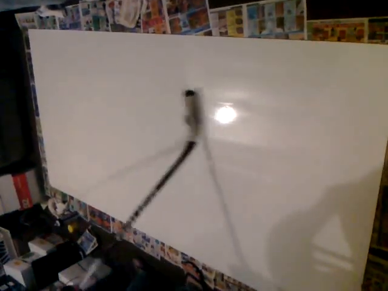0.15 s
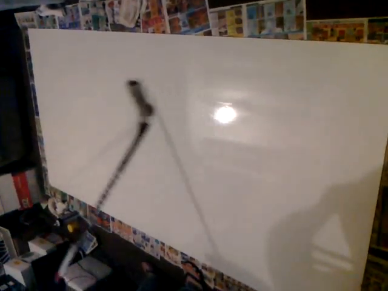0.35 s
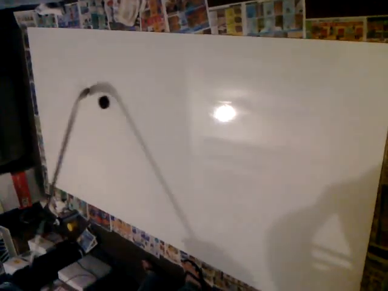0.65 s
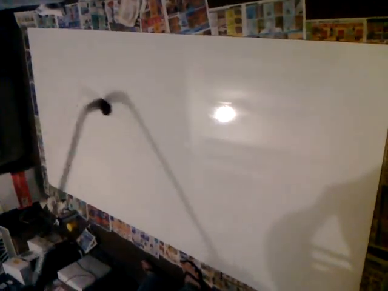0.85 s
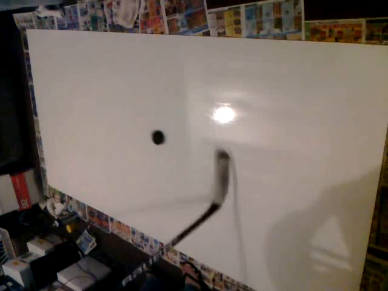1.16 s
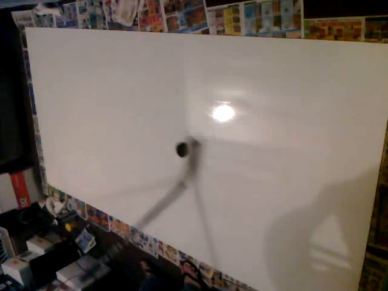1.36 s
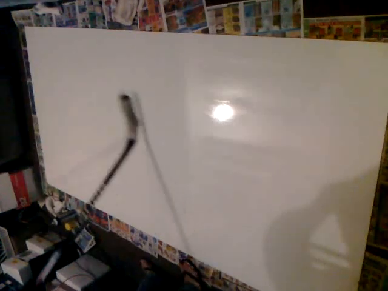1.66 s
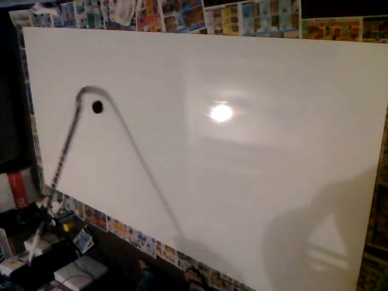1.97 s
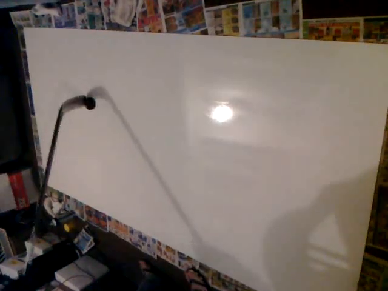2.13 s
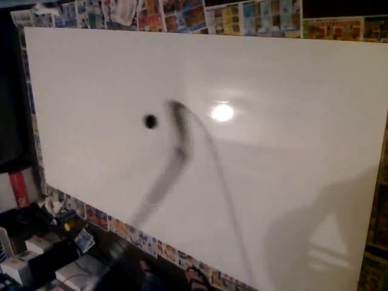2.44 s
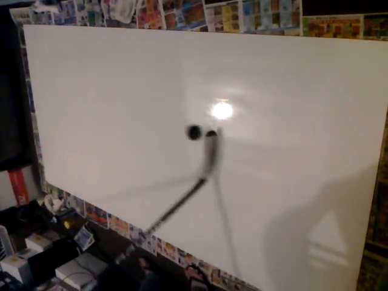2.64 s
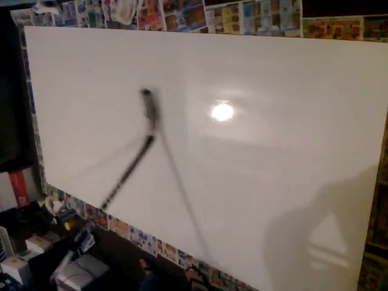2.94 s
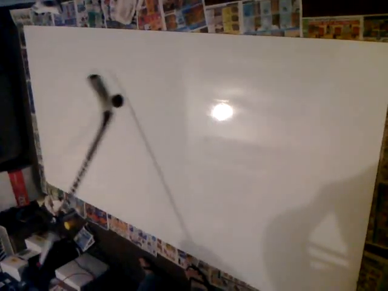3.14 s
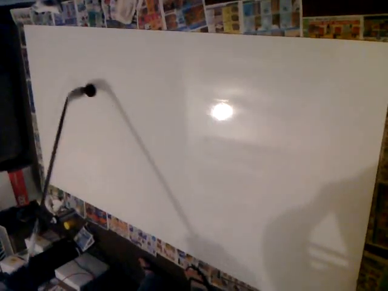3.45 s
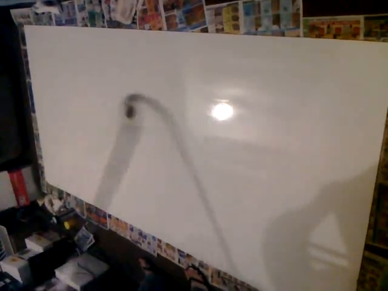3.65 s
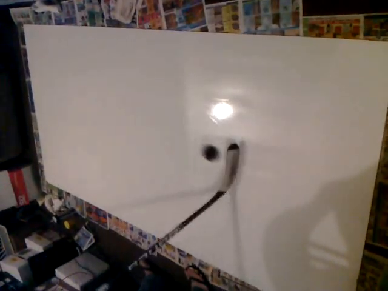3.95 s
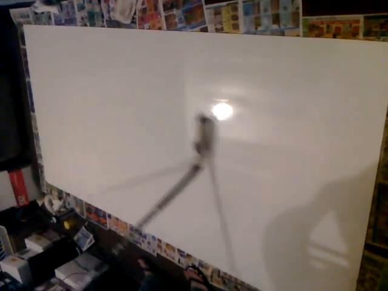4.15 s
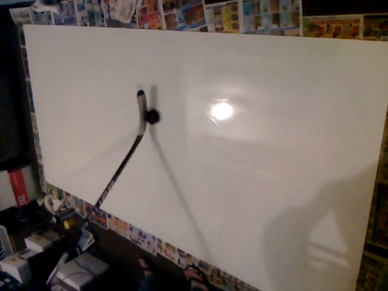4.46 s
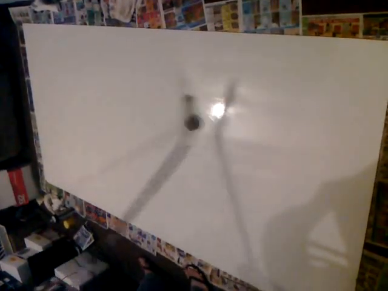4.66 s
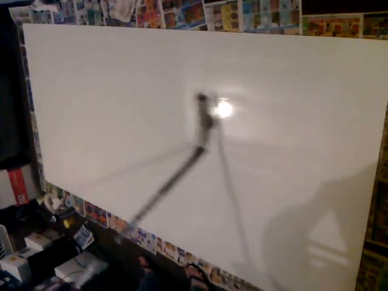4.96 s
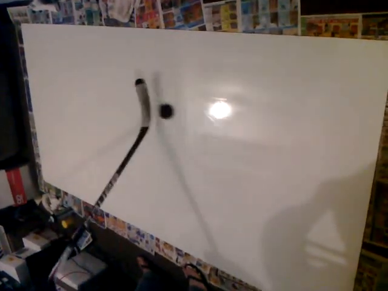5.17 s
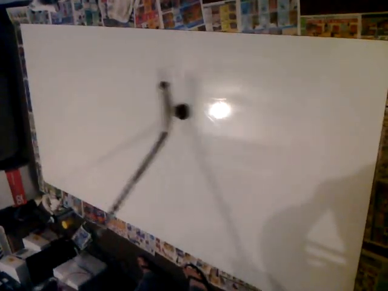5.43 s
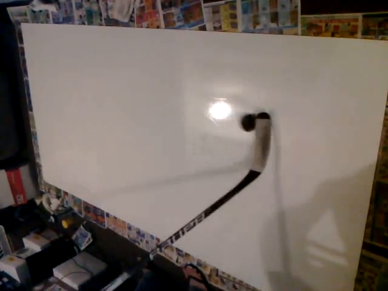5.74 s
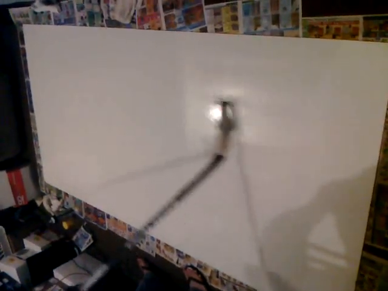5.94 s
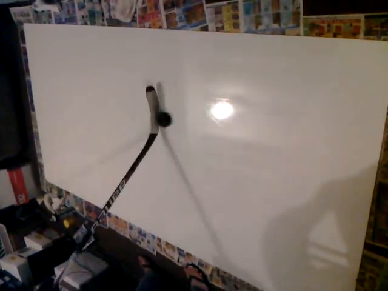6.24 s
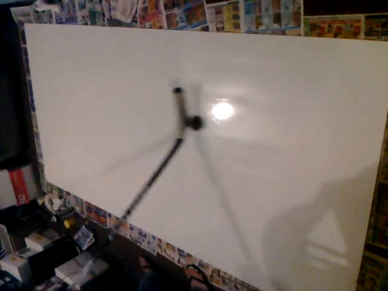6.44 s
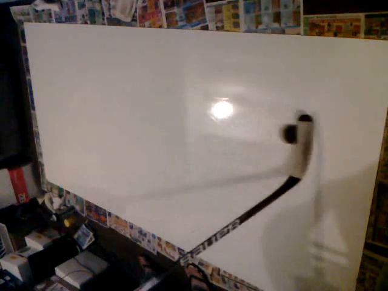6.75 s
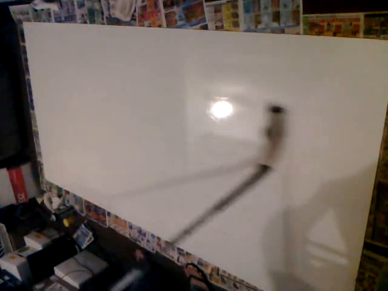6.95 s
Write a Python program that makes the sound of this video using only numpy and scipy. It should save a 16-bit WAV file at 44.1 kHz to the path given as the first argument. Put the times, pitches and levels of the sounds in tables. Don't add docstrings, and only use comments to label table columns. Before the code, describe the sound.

A small hard-walled room with faint hiss, low mains hum and a very thin high whine. At 0 s a blade drag is ending as it clacks down, with a puck knock at 0.1. A clack at 0.6 and a dull scoop at 0.8 lead into a long hissing pull until 1.2. A hard, roomy slap hits at 1.4, a set-down at 1.9, a flurry of snaps at 2.2 to 2.5 and a higher slap at 2.7. Clacks at 3.4 to 3.6 precede another scraping pull and a low, soft footfall at 3.6. Loud double knocks come at 4.1, then a busy cluster with small bright chinks from 4.4 to 4.9. Strong clacks follow near 5.3, 5.7, 5.8 and 6.3, the last especially sharp, then 6.8 to 6.9, and a faint tick at 7.1. Quiet glides and rim wobbles fill the gaps; level ducks briefly after loud blows.

```python
import sys
import numpy as np
from scipy import signal
from scipy.fft import rfft, irfft, next_fast_len
from scipy.io import wavfile

SR = 44100
rng = np.random.default_rng(int(sys.argv[2]) if len(sys.argv) > 2 else 0)


def materialize(psi):
    bounded = np.clip(np.atleast_2d(psi).T, -1, 1)
    quanta = np.round(bounded * 32767).astype(np.int16)
    wavfile.write(sys.argv[1], SR, quanta)


N = 313110

# f/Hz, level/dB per Hz
HISS_COLOUR = [(15, -44), (25, -11), (49, -6.5), (87, -9), (102, -14.5), (124, -10.5), (150, -6.5),
               (225, -14), (312, -7), (2520, -50), (7260, -38.5), (13500, -52.5), (14700, -43.5),
               (16400, -27)]
# f/Hz, level/dB rms
HUM_LINES = [(59.5, -79), (119, -71)]
HISS_DB = -76
WHINE_HZ, WHINE_DB = 15153, -87

# f/Hz, level/dB per Hz
SCRAPE_COLOUR = [(150, -27), (300, -9.5), (475, 0), (800, -9), (1500, -8), (3000, -10), (5200, -12),
                 (8000, -6.5), (10000, -11.5), (12500, -27), (15500, -34)]
# start t/s, fastest t/s, end t/s, scrape level/dB, fine hiss re scrape/dB
DRAGS = [
    (-.1, 0, .02, -46, 5),
    (.84, 1.04, 1.21, -51, 4),
    (2.25, 2.38, 2.42, -50, 2),
    (2.46, 2.51, 2.6, -57, 3),
    (3.55, 3.69, 3.86, -50, 2),
    (6.86, 6.92, 6.97, -62, 0),
]
# start t/s, fastest t/s, end t/s, scrape level/dB, fine hiss re scrape/dB
GLIDES = [(.15, .27, .33, -68, 4), (.33, .4, .62, -76, 3), (1.25, 1.36, 1.43, -66, 3),
          (1.55, 1.64, 1.78, -70, 8), (2.05, 2.14, 2.2, -68, -2), (2.85, 3.0, 3.16, -73, 6),
          (3.88, 3.92, 4.0, -73, 5), (4.5, 4.62, 4.66, -72, 2), (4.86, 4.91, 4.98, -66, 12),
          (5.06, 5.16, 5.3, -77, 12), (5.36, 5.44, 5.48, -67, -2), (5.85, 5.92, 6.04, -78, 12),
          (6.35, 6.45, 6.56, -78, 9)]
# start t/s, fastest t/s, end t/s, scrape level/dB, fine hiss re scrape/dB
WOBBLES = [(.2, .28, .33, -78, 0), (.77, .8, .81, -72, 0), (.97, 1.02, 1.21, -70, 0),
           (1.33, 1.4, 1.43, -74, 0), (2.08, 2.14, 2.18, -76, 0), (3.58, 3.61, 3.68, -63, 0),
           (3.8, 3.86, 3.92, -70, 2), (4.56, 4.64, 4.65, -72, 0), (5.47, 5.48, 5.49, -68, 0),
           (5.53, 5.58, 5.63, -64, -4), (5.96, 6.0, 6.05, -76, 0), (6.42, 6.47, 6.5, -76, 0),
           (7.02, 7.08, 7.12, -82, 0)]
DRAG_DRONE_DB, GLIDE_DRONE_DB, WOBBLE_DRONE_DB = 1, 3, 20
# scrape/dB, hiss/dB, drone/dB
STROKE_END_DB = (-4, -12, -8)
# scrape/dB, hiss/dB, drone/dB
CREEP_DB = (-77, -73, -72)
STROKE_POWER, STROKE_STOP_S = 1.5, .3
SHIVER_DB, SHIVER_RISE_S, SHIVER_T60_S = -30, .03, .6

# t/s, knock level/dB, knock f/Hz, crack level/dB, sizzle re crack/dB
SET_DOWNS = [(0.0034, -27, 410, -38, -9), (0.6322, -21, 457, -26, -11.5), (1.9049, -24, 439, -26, -9.5),
             (2.4635, -27, 467, -32, -18), (3.3648, -20, 430, -23.5, -12), (4.4238, -15, 450, -19, -14.5),
             (4.665, -29, 465, -46, -10), (4.766, -40, 430, -36, -11.5), (4.649, -38, 466, -60, -10),
             (5.255, -18, 430, -26, -12.5), (5.4866, -36, 400, -41, -11), (5.496, -30, 420, -38, -17.5),
             (5.545, -36, 430, -60, -12), (5.7149, -15, 435, -20.5, -10.5), (6.2575, -23, 450, -36, -17.5),
             (6.767, -19, 427, -26.5, -11.5), (6.896, -25, 451, -38, -12.5)]
PUCK_HITS = [(0.8529, -32, 513, -50, -30), (2.176, -40, 592, -48, -22), (2.1818, -31, 580, -25, -18),
             (2.2386, -24, 485, -29, -15.5), (2.2694, -32, 430, -38, -7), (3.5148, -23, 370, -30, -23),
             (3.5688, -29, 380, -32, -14.5), (4.088, -14.5, 430, -25, -18), (4.8678, -15, 430, -22, -19),
             (5.8279, -18, 470, -25, -20), (5.906, -25.5, 424, -27, -15), (6.2931, -14, 643, -14, -24.5),
             (6.8425, -23, 400, -25.5, -18.5), (0.1117, -20, 410, -33, -16)]
TICKS = [
    (0.278, -50, 460, -70, -8),
    (1.2883, -70, 299, -54, -8),
    (1.205, -48, 470, -65, -8),
    (3.62, -40, 450, -60, -8),
    (4.25, -50, 450, -70, -8),
    (5.022, -43, 435, -70, -8),
    (5.0644, -58, 462, -62, 1),
    (6.508, -38, 437, -60, -5),
    (7.0813, -70, 450, -56, -11),
]
SCOOPS = [
    (0.8116, -25, 380, -25, -17.5),
    (4.8038, -10.5, 440, -25, -7.5),
]
TOE_TAPS = [
    (1.343, -55, 436, -44, -6),
    (1.768, -62, 535, -58, -4.5),
    (1.836, -75, 500, -63, -5),
    (4.0565, -14, 447, -19, -15.5),
    (5.2956, -16, 540, -23.5, -15),
]
SLAPS = [
    (1.435, -12.5, 498, -19, -14),
    (2.7325, -14, 560, -24, -16),
]
CHINKS = [
    (4.6564, -31, 420, -37, -3),
    (4.676, -45, 460, -40, -12),
    (4.755, -29, 440, -40, -20),
]
# overtone re knock/dB, knock t60/s, echo/dB, ring f/Hz, ring re crack/dB, wash/dB
SET_DOWN = (-24, .019, -11, 1450, -5, -8)
PUCK_HIT = (5, .01, -12, 1560, -5, -10)
TICK = (-22, .022, -11, 1500, -4, -7.5)
SCOOP = (-15, .018, -13, 1550, -2, -2)
TOE_TAP = (-5, .013, -10, 3520, -8, -8)
SLAP = (22, .008, -13, 1400, -3, -2)
CHINK = (-15, .02, -13, 3550, 8, -17)

# f/Hz, level/dB, t60/s
BOARD_MODES = [(295, -6.5, 0.2), (332, 6, 0.094), (356.2, 2.4, 0.14), (415.3, -4.5, 0.084),
               (436, -0.5, 0.14), (479.3, 3.5, 0.077), (518.5, 1, 0.04), (653, -4.5, .1), (683, -2, .1),
               (809, -11, 0.097), (935, -19, 0.05)]
# f/Hz, level/dB per Hz
SNAP_COLOUR = [(600, -15), (1200, -7), (2000, -7.5), (3500, -10), (5200, -12), (8000, -10), (10500, -20.5),
               (13000, -36), (16000, -39)]
# f/Hz, t60/s
ROOM_T60 = [(100, 0.41), (260, 0.25), (700, 0.24), (1840, 0.38), (4850, 0.27), (12800, 0.17)]
# f/Hz, level/dB
ROOM_GAIN = [(100, -2), (300, 4.1), (600, -0.3), (1500, -6.3), (4000, 7.54), (9000, 9), (14000, 0.1)]
WALL_GAIN_PER_DB = .25
KNOCK_DELAY_S, CRACK_DELAY_S = .0006, .0003
TAIL = round(.55 * SR)
BANDS_HZ = 45 * 2 ** np.arange(0, 9.1, .5).clip(0, 8.8)
LONG_WAVES_HZ, SHORT_WAVES_HZ = BANDS_HZ[2:13:2], BANDS_HZ[6::2]

STEP_S, STEP_DB, STEP_RISE_S, STEP_T60_S = 3.626, -48, .03, .2
LEAN_DB, LEAN_UNTIL_S, LEAN_T60_S = -62, 3.8, .5


def from_db(db):
    return 10 ** (np.asarray(db) / 20)


def rms_one(x):
    return x / np.sqrt(np.mean(x ** 2, axis=-1, keepdims=True) + 1e-20)


def at_hz(points, hz):
    f, value = np.transpose(points)
    return np.interp(np.log(hz), np.log(f), value)


def cut(x, hz, kind, order=2):
    return signal.sosfilt(signal.butter(order, hz, kind, fs=SR, output="sos"), x)


def colour(x, spectrum):
    hz = np.fft.rfftfreq(x.shape[-1], 1 / SR) + 1
    return irfft(rfft(x) * from_db(at_hz(spectrum, hz)), x.shape[-1])


def convolve(a, b):
    size = next_fast_len(a.shape[-1] + b.shape[-1])
    return irfft(rfft(a, size) * rfft(b, size), size)


def drift(rate):
    knots = rng.standard_normal(2000)
    return np.interp(np.arange(N) / SR * 2 * rate, np.arange(2000), knots)


def background():
    t = np.arange(N) / SR
    whine = np.sqrt(2) * from_db(WHINE_DB) * np.sin(2 * np.pi * WHINE_HZ * t)
    hiss = from_db(HISS_DB + 5) * rms_one(colour(rng.standard_normal(N), HISS_COLOUR))
    hum = 0
    for hz, db in HUM_LINES:
        hum = hum + np.sqrt(2) * from_db(db + 1.2 * drift(3)) * np.sin(2 * np.pi * hz * t)
    return hum + whine + hiss


def blows():
    kinds = [(SET_DOWNS, SET_DOWN), (PUCK_HITS, PUCK_HIT), (SLAPS, SLAP), (SCOOPS, SCOOP),
             (TOE_TAPS, TOE_TAP), (CHINKS, CHINK), (TICKS, TICK)]
    rows = [tuple(row) + tuple(kind) for hits, kind in kinds for row in hits]
    return np.transpose(rows)[:, :, None]


def contact():
    t = np.arange(0, N / SR + .01, .002)
    power = from_db(2 * np.array(CREEP_DB))[:, None] * np.ones(len(t))
    kinds = (DRAGS, DRAG_DRONE_DB), (GLIDES, GLIDE_DRONE_DB), (WOBBLES, WOBBLE_DRONE_DB)
    for strokes, drone_db in kinds:
        for start, fastest, end, scrape_db, hiss_db in strokes:
            before = (fastest - t) / max(fastest - start, .01)
            after = (t - fastest) / max(end - fastest, .01)
            away = np.minimum(np.maximum(before, after), 1)
            outside = np.maximum(np.maximum(start - t, t - end), 0)
            speed_db = np.outer(STROKE_END_DB, away ** STROKE_POWER) - 60 * outside / STROKE_STOP_S
            power += from_db(2 * (scrape_db + speed_db + np.array([[0], [hiss_db], [drone_db]])))
    s, knock_db = blows()[:2]
    since = np.maximum(t - s, 0)
    shiver = from_db(knock_db + SHIVER_DB - 60 * since / SHIVER_T60_S)
    shiver *= 1 - np.exp(-since / SHIVER_RISE_S)
    power[2] += np.sum(shiver ** 2, axis=0)
    return [np.interp(np.arange(N) / SR, t, level_db) for level_db in 10 * np.log10(power)]


def sliding():
    scrape_db, hiss_db, drone_db = contact()
    spikes_db = 1.8 * rng.exponential(1, N) * (rng.random(N) < .05)
    grains = rng.standard_normal((2, N)) * from_db(spikes_db)
    rub = rms_one(colour(grains, SCRAPE_COLOUR))
    uneven = drift(39)
    out = np.zeros(N)
    for k, (low, high) in enumerate(zip(BANDS_HZ[3:], BANDS_HZ[4:])):
        if low < 700:
            level_db = drone_db + 4.5
        elif low < 4000:
            level_db = scrape_db + 4.5
        else:
            level_db = hiss_db + 2.5
        patch_db = 2.2 * drift(7) + 1.1 * uneven
        out += cut(rub[k % 2], [low, high], "band") * from_db(level_db + patch_db)
    return out


def room(echoes, octaves):
    t, out = np.arange(TAIL) / SR, np.zeros(echoes.shape)
    for low, high in zip(octaves, octaves[1:]):
        hz = np.sqrt(low * high)
        fade = from_db(at_hz(ROOM_GAIN, hz) - 60 * t / at_hz(ROOM_T60, hz))
        out += cut(echoes, [low, high], "band", order=1) * fade
    return out


def board(knock_hz, t):
    luck, out = rng.standard_normal((len(BOARD_MODES), len(knock_hz), 1)), 0
    for (hz, level_db, t60), chance in zip(BOARD_MODES, luck):
        near_db = -25 * np.log2(hz / knock_hz) ** 2
        size = np.sign(chance) * from_db(level_db + near_db - 4.9 * np.abs(chance))
        out = out + size * np.sin(2 * np.pi * hz * t) * from_db(-60 * t / t60)
    return out * (1 - np.exp(-t / .006))


def lay(times, sounds):
    t, out = np.arange(TAIL) / SR, np.zeros(N + TAIL)
    sounds = sounds * np.minimum(t / .0002, 1) * np.minimum((t[-1] - t) * 20, 1)
    for at, sound in zip(np.round(times[:, 0] * SR).astype(int), sounds):
        out[at:at + TAIL] += sound
    return cut(out[:N], 135, "high")


def cracks():
    s, _, _, peak_db, sizzle_db, *_, ring_hz, ring_db, wash_db = blows()
    t, shape = np.arange(TAIL) / SR, (len(s), TAIL)
    white = rng.standard_normal((2,) + shape)
    wash = room(white, SHORT_WAVES_HZ) * (1 - np.exp(-t / .0018)) * from_db(wash_db)
    wash *= from_db(1.5 * rms_one(cut(rng.standard_normal(shape), 120, "low")))
    start_db, t60 = np.array([.1, 3])[:, None, None], np.array([.01, .006])[:, None, None]
    burst = white * from_db(start_db - 60 * t / t60) + wash
    burst[..., 14] += 6
    hz = np.fft.rfftfreq(TAIL, 1 / SR)
    detune = (hz - ring_hz) / (.081 * ring_hz)
    ring = 1 + from_db(ring_db + 7.5) / (1 + detune ** 2)
    snap = irfft(rfft(colour(burst[0], SNAP_COLOUR)) * ring, TAIL)
    snap = cut(snap, 3100, "low") * from_db(5.5)
    sizzle = cut(colour(burst[1], SNAP_COLOUR), 6100, "high") * from_db(sizzle_db + 17)
    return lay(s + CRACK_DELAY_S, from_db(peak_db) * (snap + sizzle))


def clacks():
    s, peak_db, knock_hz, _, _, overtone_db, t60, echo_db, *_ = blows()
    t, shape = np.arange(TAIL) / SR, (len(s), TAIL)
    face = rng.choice([-1, 1], (len(s), 1))
    push = np.sin(2 * np.pi * knock_hz * t + 1.7) * from_db(-60 * t / np.clip(t60, .004, .05))
    push += np.sin(2 * np.pi * 850 * t + .58) * from_db(overtone_db - 32 - 60 * t / .0055)
    push = face * cut(push * (1 - np.exp(-t / .00031)), 198, "high", order=1)
    density = np.clip(.03 + (t / .15) ** 2, 0, 1)
    echoes = (rng.random(shape) < density) * rng.standard_normal(shape) / np.sqrt(density)
    echoes *= 1 - np.exp(-(t / .008) ** 2)
    walls = convolve(push[:, :1024], room(echoes, LONG_WAVES_HZ))[:, :TAIL]
    walls_db = echo_db - 19 + WALL_GAIN_PER_DB * np.maximum(overtone_db, 0)
    sheet = from_db(echo_db - .5) * board(knock_hz, t)
    knock = push + from_db(walls_db) * walls + sheet
    return lay(s + KNOCK_DELAY_S, from_db(peak_db + 8) * knock)


def step():
    t = np.arange(N) / SR
    rise = np.clip((t - STEP_S) / STEP_RISE_S + 1, 0, 1) ** 2
    land = from_db(STEP_DB - 60 * np.maximum(t - STEP_S, 0) / STEP_T60_S)
    lean = from_db(LEAN_DB - 60 * np.maximum(t - LEAN_UNTIL_S, 0) / LEAN_T60_S)
    rumble = rms_one(cut(rng.standard_normal(N), [55, 160], "band", order=3))
    return rise * (land + lean) * rumble


def scene():
    return (background() + sliding() + cracks() + clacks() + step())[None]


def top_cut(x):
    return signal.sosfilt(signal.butter(12, 16530, fs=SR, output="sos"), x)


def record(dry):
    release = 40 * np.arange(N) / SR
    over_db = np.maximum(20 * np.log10(np.abs(dry) + 1e-9) + 24, 0)
    held_db = np.maximum.accumulate(over_db + release, axis=-1) - release
    duck_db = cut(held_db, 100, "low", order=1)
    narrow = signal.sosfilt(signal.cheby2(12, 50, 16450, fs=SR, output="sos"), dry)
    return top_cut(narrow * from_db(-.3 * duck_db))


dry = scene()
out = record(dry)
materialize(out)
```